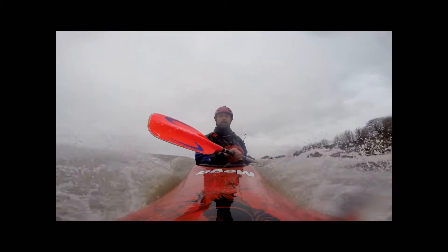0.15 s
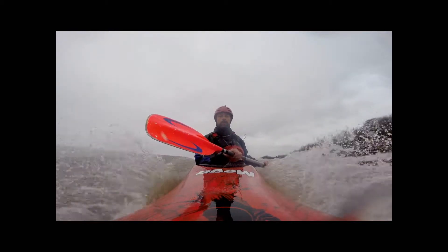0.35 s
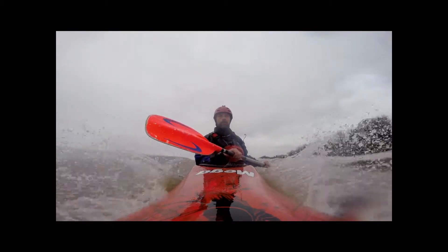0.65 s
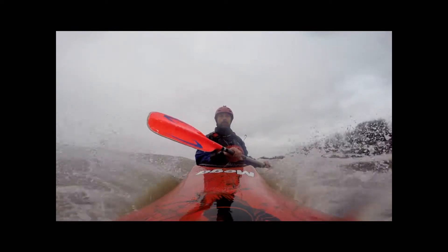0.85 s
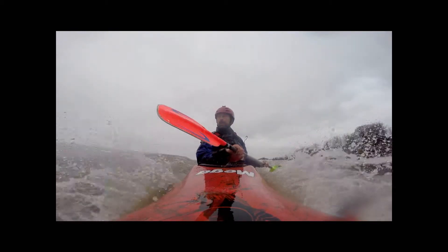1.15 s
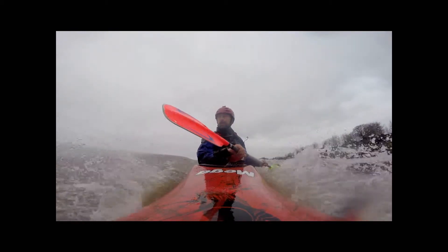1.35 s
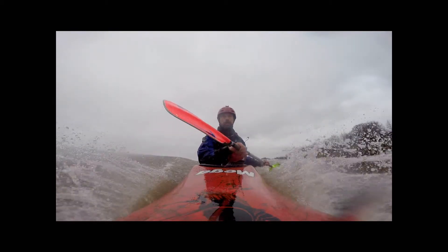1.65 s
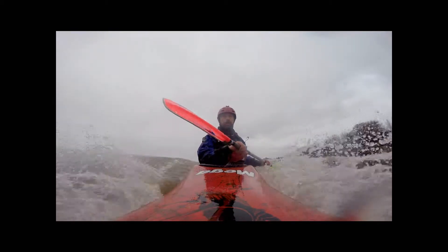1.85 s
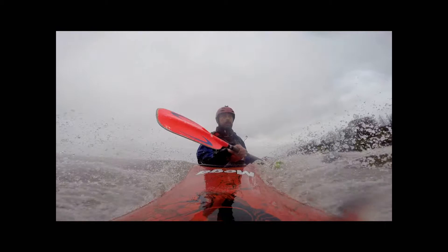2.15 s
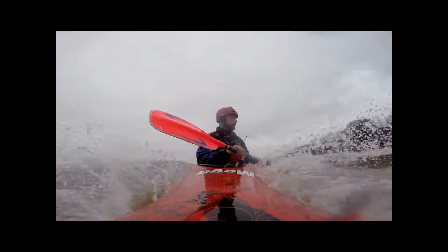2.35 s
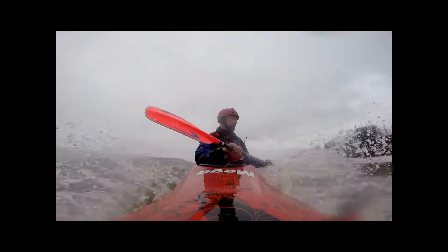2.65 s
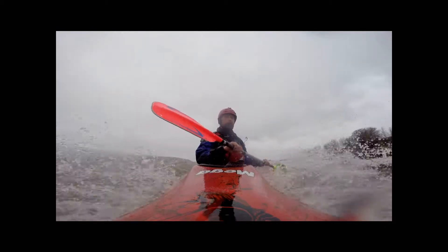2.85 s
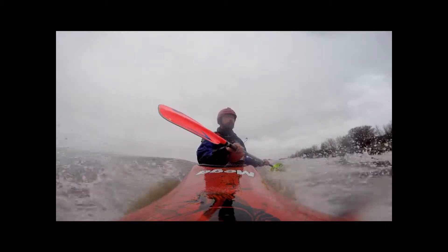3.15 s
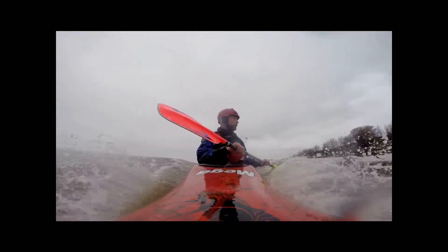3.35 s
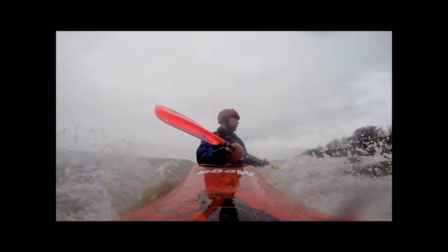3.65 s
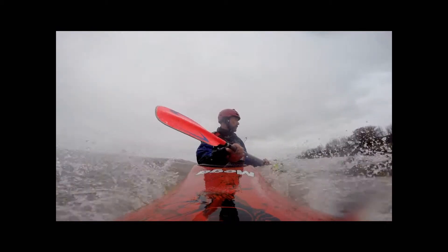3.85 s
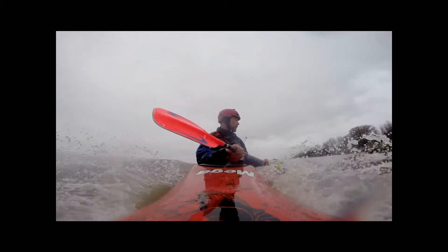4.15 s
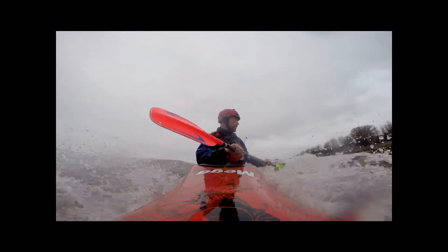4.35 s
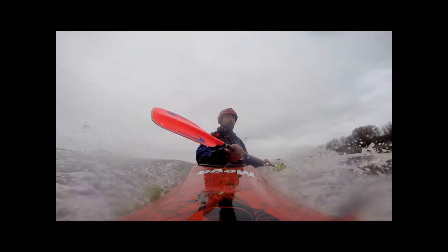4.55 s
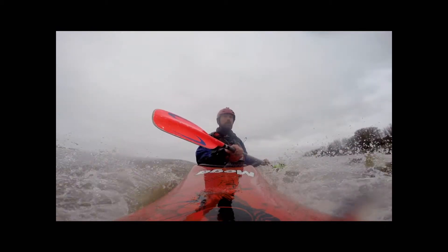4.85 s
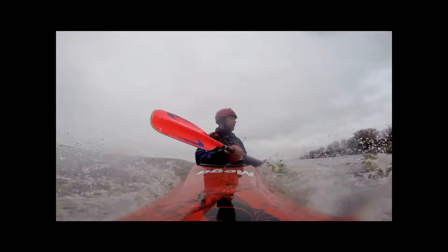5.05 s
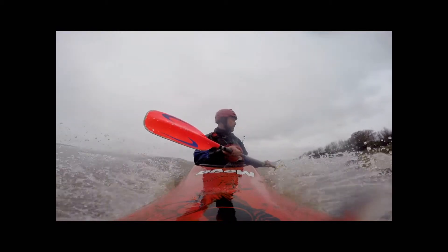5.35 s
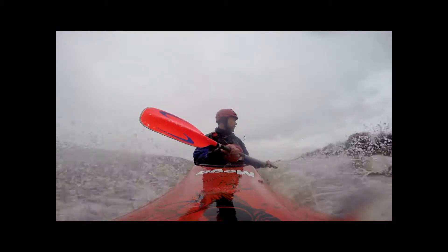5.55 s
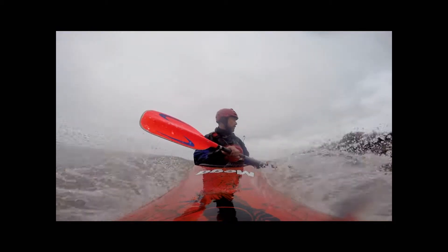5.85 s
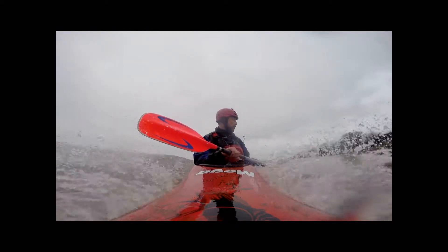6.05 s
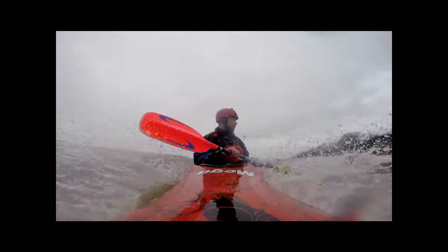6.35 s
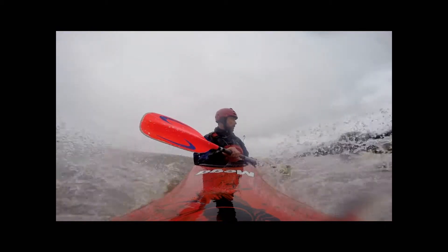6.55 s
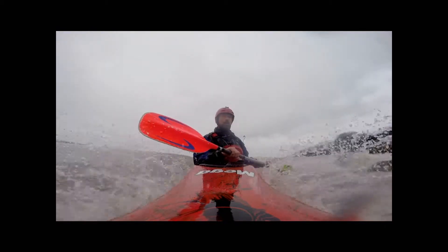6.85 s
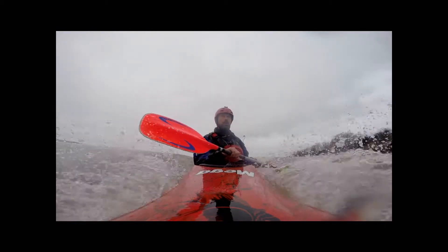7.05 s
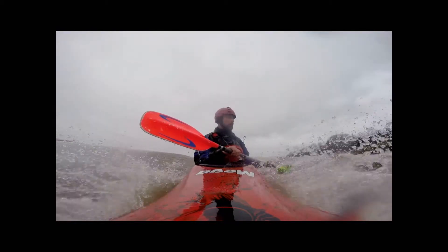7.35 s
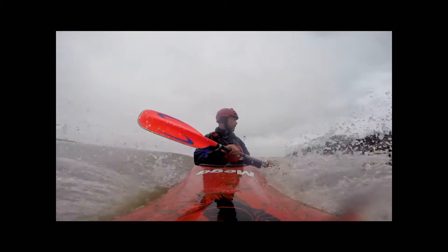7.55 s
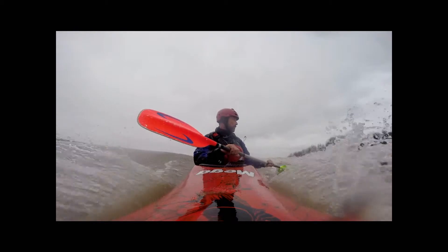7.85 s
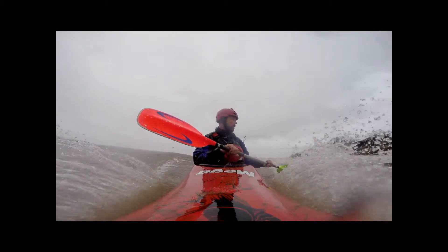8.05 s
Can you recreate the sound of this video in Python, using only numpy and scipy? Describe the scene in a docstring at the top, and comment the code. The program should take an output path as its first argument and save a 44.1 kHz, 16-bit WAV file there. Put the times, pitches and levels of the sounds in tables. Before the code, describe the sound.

For about eight seconds, whitewater churns around a plastic kayak, heard from a microphone in a sealed case on the deck. Waves thump the hull several times a second, swelling a deep, wavering hum and hollow rumble. Above this, close spray spatters, small bubbles burst and foam hisses, with an even hiss of water farther away. The case makes the water sound boxy and softens its top end.

Sheets of spray surge around 1.3, 2.7, 3.3, 4.3, 5.3 and 7.3 seconds. Short, sharp splashes slap the case irregularly throughout, standing out near 1.3, 2.6, 3.3, 3.6 and 5.7 seconds and crowding together from 7.3 seconds to the end. Occasional droplets give tiny high pings, several close together just before 7 seconds. The rush dips for an instant here and there, as at 2.2 and 5.2 seconds, but never stops.

```python
"""On the deck of a plastic kayak in whitewater, the microphone shut in a sealed case.
Right underneath, waves thump the hull, which hums and rumbles in its low modes. Close by, spray
spatters on deck and case, bubbles burst and foam hisses; water farther off adds an even, bright hiss.
Splashes slap and droplets ping on the case, whose resonances colour the spray and the splashes."""
import sys
import numpy as np
from scipy import signal
from scipy.fft import rfft, irfft
from scipy.io import wavfile
from scipy.ndimage import uniform_filter1d, minimum_filter1d

SR = 44100
rng = np.random.default_rng(int(sys.argv[2]) if len(sys.argv) > 2 else 0)


def int16_out(signal):
    """Quantize to a 16-bit WAV file."""
    q = np.round(np.clip(np.atleast_2d(signal).T, -1, 1) * 32767)
    wavfile.write(sys.argv[1], SR, q.astype(np.int16))


N = 361179
TIME = np.arange(N) / SR
# slow relative levels, ducking after the slaps at 0.46 and 3.56 s:
# t/s, hull ring/dB, spatter/dB, fine foam/dB
LEVELS = [(0, -47, -46, -38), (0.13, -44.5, -48.5, -43), (0.34, -38.5, -44, -33), (0.47, -54, -46, -53),
          (0.57, -46, -47.5, -51), (0.9, -42.5, -41.5, -38.5), (1.2, -38, -40.5, -40), (1.7, -51, -38, -38),
          (2.6, -42, -35, -40), (3.3, -43, -40, -41), (3.55, -43.5, -36, -42.5), (3.72, -45.5, -42, -43.5),
          (3.9, -43.5, -36, -39), (5, -42, -39.5, -37), (6, -40, -36, -37.5), (6.8, -42.5, -35.5, -36),
          (7.2, -39.5, -39, -32.5), (7.5, -40.5, -32.5, -37.5), (7.9, -38, -36, -31.5),
          (8.19, -41, -36, -34.5)]


def undb(db):
    """Gain of a level in dB."""
    return 10 ** (np.asarray(db) / 20)


def unit(x):
    """Scaled to rms 1."""
    return x / np.sqrt(np.mean(x ** 2))


def columns(table):
    """Each column after the time column, sample by sample."""
    times, *curves = np.transpose(table)
    return [np.interp(TIME, times, curve) for curve in curves]


def band(x, hz, width):
    """Two-pole resonance, gain 1 at the centre."""
    return signal.lfilter(*signal.iirpeak(hz, hz / width, fs=SR), x)


def noise_band(hz, width):
    """Noise passed twice through one resonance."""
    return band(band(rng.standard_normal(N), hz, width), hz, width)


def walk(rate):
    """Random levels held 1 / rate s and slewed twice; spread 1."""
    hold = int(SR / rate)
    steps = np.repeat(rng.standard_normal(N // hold + 1), hold)
    slewed = uniform_filter1d(uniform_filter1d(steps, hold), hold)[:N]
    return slewed / slewed.std()


def swells(base_db, rows):
    """A level in dB with bell-shaped swells (t/s, level/dB, rise/s, fall/s) added in power."""
    t = TIME[::64]
    power = sum(undb(2 * db) * np.exp(-((t - s) / np.where(t < s, rise, fall)) ** 2)
                for s, db, rise, fall in rows)
    return 10 * np.log10(undb(2 * base_db) + np.interp(TIME, t, power))


def colour(x, points, modes=(), size=8192):
    """Minimum-phase filter whose gain follows the spectrum points plus bell-shaped modes."""
    f = np.maximum(np.fft.rfftfreq(size, 1 / SR), 1)
    hz, db = np.transpose(points)
    bells_db = sum(height / (1 + (2 * (f - centre) / width) ** 2) for centre, width, height in modes)
    gain_db = np.interp(np.log(f), np.log(hz), db) + bells_db
    cepstrum = irfft(np.log(undb(gain_db)))
    cepstrum[1:size // 2] *= 2
    cepstrum[size // 2 + 1:] = 0
    return signal.fftconvolve(x, irfft(np.exp(rfft(cepstrum))))[:N]


def plip(hz, cycles, glide):
    """A damped tone that glides up; it decays by 1/e in the given number of cycles."""
    t = np.arange(int(5 * cycles / hz * SR)) / SR
    age = t * hz / cycles
    return np.sin(2 * np.pi * hz * t * (1 + glide * age / 2)) * np.exp(-age) * (1 - np.exp(-6 * age))


def through_case(x, size=8192):
    """Water as the microphone hears it through the resonant walls of the sealed case."""
    # broad spectrum inside the case: f/Hz, level/dB
    spectrum = [(220, -40), (380, -14.5), (464, -11.5), (640, -3.5), (831, -8), (1510, -5), (1680, -7.5),
                (2320, -5.5), (2790, -18), (3510, -12.5), (3850, -16.5), (9520, -35.5), (14900, -57.5)]
    # resonances and dips of the case: f/Hz, width/Hz, level/dB
    modes = [(700, 210, -3), (1568, 113, 3), (1650, 38, -11), (2510, 600, 4), (3200, 166, -9.5),
             (3320, 220, 3.5), (3835, 390, -4), (4880, 103, -7.5), (5350, 200, -3), (5990, 600, 3.5),
             (6460, 400, -7.5), (6800, 550, 0.5), (7470, 570, -5.5), (7950, 300, 2.5), (8590, 1100, -5.5),
             (9430, 700, 2), (10690, 850, -10), (13600, 620, 1.5)]
    return colour(x, spectrum, modes, size)


def hull_hum(hz=84, wander_hz=5.5, rest_db=-39.5, flutter_db=2.5):
    """The hull's lowest mode hums at a wandering pitch and swells with each wave."""
    # waves thumping the hull: t/s of the peak, level/dB, length/s
    thumps = [(0.018, -24, 0.036), (0.25, -29, 0.11), (0.37, -24, 0.05), (0.67, -39, 0.062),
              (0.77, -29.5, 0.097), (1.034, -28.5, 0.055), (1.307, -22.5, 0.045), (1.504, -25, 0.048),
              (1.663, -33, 0.11), (1.79, -27.5, 0.078), (2.024, -24.5, 0.1), (2.154, -29.5, 0.022),
              (2.308, -26, 0.053), (2.458, -26.9, 0.068), (2.612, -31, 0.045), (2.693, -25, 0.031),
              (2.875, -32.5, 0.04), (3.146, -27, 0.086), (3.288, -27.5, 0.14), (3.41, -26.5, 0.089),
              (3.503, -30, 0.06), (3.79, -34.5, 0.056), (3.917, -30, 0.041), (4.034, -23.5, 0.05),
              (4.223, -26.5, 0.09), (4.36, -27, 0.05), (4.528, -27, 0.096), (4.705, -26.5, 0.077),
              (4.984, -22.5, 0.089), (5.107, -26.5, 0.051), (5.26, -23.5, 0.054), (5.364, -22.5, 0.066),
              (5.46, -29, 0.067), (5.56, -32, 0.092), (5.72, -35.5, 0.065), (5.87, -25, 0.055),
              (6.01, -21, 0.039), (6.133, -27.6, 0.052), (6.39, -28, 0.2), (6.504, -23.5, 0.055),
              (6.768, -29, 0.037), (6.86, -33.5, 0.047), (6.945, -28, 0.044), (7.02, -26, 0.042),
              (7.177, -30, 0.066), (7.256, -32, 0.044), (7.352, -27.7, 0.028), (7.5, -33, 0.05),
              (7.62, -30, 0.055), (7.755, -28.3, 0.052), (7.957, -23.5, 0.036), (8.065, -29, 0.065)]
    rows = [(s, db, 0.4 * length, 0.47 * length) for s, db, length in thumps]
    level_db = swells(rest_db + 3.7 * walk(8), rows)
    phase = 2 * np.pi * np.cumsum(hz + wander_hz * walk(25)) / SR
    return unit(np.sin(phase)) * undb(level_db + flutter_db * walk(25))


def hull_ring(rise_s=0.023, fall_s=0.03, rumble_db=-35.5):
    """Buffeting water rings the higher hull modes and, less strongly, swells a broad rumble."""
    # higher hull modes: f/Hz, width/Hz, relative level/dB
    modes = [(110.4, 9.4, -2), (167.1, 21.2, 5), (193, 24, -15), (305.8, 41.5, 0.5), (372.7, 22, -10)]
    # short knocks on the hull: t/s of the peak, level/dB
    knocks = [(0.32, -38), (0.45, -39.5), (0.65, -39), (1.27, -37), (1.59, -38.5), (1.77, -33),
              (2.15, -36.5), (2.31, -37.5), (2.66, -37.5), (2.81, -38.5), (3.81, -39), (3.92, -40),
              (4.03, -40.5), (4.28, -36.5), (4.45, -35), (4.9, -36.5), (5.97, -41), (6.08, -40), (6.4, -39),
              (6.8, -38.5), (6.95, -37.5), (7.09, -38.5), (7.4, -34.5), (7.91, -33)]
    # drift of the balance toward the modes above (+) or below (-) 250 Hz: t/s, tilt/dB
    tilt = [(0, 1.5), (1.1, 2), (2.3, -2), (3.3, 0.5), (4, -1), (5, 2), (6, -0.5), (7, -1), (7.7, -1),
            (8.19, -2.5)]
    # spectrum of the hull's rumble: f/Hz, relative level/dB
    rumble_spectrum = [(11, -36.5), (18, -25), (61, -7.5), (86, -1), (106, -7.5), (136, -20.5), (181, -22),
                       (229, -24.5), (314, -22.5), (480, -50.5), (620, -56.5), (1060, -120)]
    ring_db = swells(columns(LEVELS)[0] + 1.08 * walk(16), [(s, db, rise_s, fall_s) for s, db in knocks])
    tilt_db, = columns(tilt)
    ring = sum(undb(db + np.sign(hz - 250) * tilt_db) * unit(noise_band(hz, 1.43 * width))
               for hz, width, db in modes)
    rumble = unit(colour(rng.standard_normal(N), rumble_spectrum, modes=[(90.0, 32, -3)]))
    swell_db = .3 * (ring_db - ring_db.mean())
    return unit(ring) * undb(ring_db) + rumble * undb(rumble_db + swell_db)


def drops(rate, spread_db, fade_ms, rise_ms):
    """Power envelope of scattered drops: many small, few large, each swelling and fading fast."""
    when, size = rng.random((int(rate * N / SR), 2)).T
    hits = np.zeros(N)
    np.add.at(hits, (when * N).astype(int), undb(-2 * spread_db * np.log(1 - .97 * size)))
    for ms in (fade_ms, rise_ms):
        hits = signal.lfilter([1], [1, -np.exp(-2000 / (ms * SR))], hits)
    return hits / hits.mean()


def spatter(shared=0.74, steady=0.34):
    """Drops strike in many bands at once or in one, over a steady wash. Rows: coarse part, fine foam."""
    wide = drops(rate=55, spread_db=4.0, fade_ms=5.0, rise_ms=3.5)
    out = 0
    for hz in 450 * 2 ** np.arange(0, 5.1, .5):
        own = drops(rate=60, spread_db=3.6, fade_ms=3.9, rise_ms=3.2)
        # the treble is mostly fine foam: drops stand out less there and seldom fall in step
        coarse = 1 / (1 + (hz / 4000) ** 2)
        together = shared / (1 + (hz / 2500) ** 2)
        power = steady ** 2 + (0.19 + 0.37 * coarse) * (together * wide + (1 - together) * own)
        out = out + np.sqrt([[coarse], [1 - coarse]]) * unit(np.sqrt(power)) * noise_band(hz, hz / 1.45)
    return out


def bubbles(rate=220, low_hz=1300, octaves=2.2, spread_db=3.5):
    """Small bubbles burst in the churn at scattered times and pitches; rms 1."""
    out = np.zeros(N + SR)
    for when, pitch, size, ring in rng.random((int(rate * N / SR), 4)):
        tone = plip(low_hz * 2 ** (octaves * pitch), cycles=2.5 + 4.0 * ring, glide=.01)
        i = int(when * N)
        out[i:i + len(tone)] += tone * undb(-spread_db * np.log(1 - .97 * size))
    return unit(out[:N])


def whitewater(gush_foam_db=-9.5):
    """Spray on the deck, churn along the hull and distant water, all heard through the case."""
    # sheets of spray thrown over the deck: t/s of the peak, relative level/dB, length/s
    gushes = [(0.018, -35, 0.054), (0.203, -38.5, 0.042), (0.34, -38.5, 0.07), (1.004, -33, 0.05),
              (1.2, -32.5, 0.074), (1.34, -31, 0.11), (1.885, -34.5, 0.26), (2.693, -31, 0.23),
              (3.16, -31.5, 0.29), (3.343, -28.5, 0.082), (3.924, -39, 0.23), (4.2, -32, 0.075),
              (4.287, -31.5, 0.078), (4.468, -33.5, 0.22), (4.823, -35, 0.14), (4.967, -32, 0.06),
              (5.286, -33, 0.17), (5.603, -33.5, 0.19), (6.082, -33, 0.14), (6.67, -33, 0.056),
              (7.072, -33.5, 0.082), (7.34, -29.5, 0.12), (7.7, -32.5, 0.084), (7.913, -31, 0.062)]
    rows = np.array([(s, db, 0.44 * length, 0.5 * length) for s, db, length in gushes])
    _, spatter_db, foam_db = columns(LEVELS)
    flicker_db = 1.5 * walk(14)  # the spray also comes and goes at random
    spatter_db = swells(spatter_db + flicker_db, rows)
    foam_db = swells(foam_db + .6 * flicker_db, rows + [0, gush_foam_db, 0, 0])
    coarse, foam = spatter()
    spray = (coarse + bubbles() * undb(-11)) * undb(spatter_db) + foam * undb(foam_db)
    far_hiss = signal.lfilter([1, -1], [1, .3], rng.standard_normal(N)) * undb(-34.5)
    churn = band(rng.standard_normal(N), hz=575, width=500) * undb(-35.0 + 2.0 * walk(10))
    # far hiss and churn follow the foam's slow level
    surge = undb(0.24 * (uniform_filter1d(foam_db, size=SR // 4) - foam_db.mean()))
    return through_case(spray + (far_hiss + churn) * surge) * undb(7.0)


def splashes(fade_ms=2.2, lead_s=.0015, samples=4096):
    """Close splashes: each a short burst, strongest around its own centre, coloured by the case."""
    # loud splashes: t/s, peak level/dB, centre f/Hz, relative level of the broad part/dB
    slaps = [(0.389, -31, 1570, 0), (0.458, -21.5, 1580, -1), (0.636, -29, 2110, -8),
             (0.972, -26.5, 2330, 15), (1.216, -22, 2220, -6), (1.31, -19.5, 2200, -6),
             (1.414, -22, 1530, -11), (1.496, -26, 1530, 13), (1.591, -27.5, 1090, -6),
             (1.674, -27.5, 2180, -13), (1.822, -30.5, 2380, -1), (2.147, -25.5, 1330, -21.5),
             (2.228, -33, 2120, -16), (2.262, -26.5, 2210, -6), (2.404, -25.5, 2250, 11),
             (2.579, -19, 1190, -15), (2.891, -28, 1500, -22), (2.959, -29.5, 1330, -17),
             (3.072, -23.5, 1780, -12), (3.159, -23, 1540, -22), (3.209, -26.5, 2460, -11),
             (3.323, -18, 750, -15), (3.495, -29.5, 2180, -13), (3.563, -18, 2050, -24),
             (3.795, -24.5, 2040, -9), (3.958, -31.5, 2340, -13), (4.018, -26, 2400, -21),
             (4.192, -25, 1480, -13), (4.272, -23, 1970, 7), (4.438, -26, 2380, 1), (4.52, -24.5, 1240, -3),
             (4.578, -21.5, 1750, -1), (4.692, -22, 1970, -7), (4.81, -24.5, 2310, -15),
             (4.955, -21.5, 2160, -3), (5.054, -24, 1720, -9), (5.135, -26, 2430, -25),
             (5.264, -22, 2380, -9), (5.313, -22, 1510, -1), (5.372, -19.5, 2310, -5),
             (5.583, -23.5, 2110, -13), (5.662, -16.5, 2360, -40), (5.773, -28.5, 2350, -17),
             (5.804, -25, 2420, -23), (5.846, -21.5, 1980, -4), (6.069, -22, 1480, -12),
             (6.132, -22.5, 1510, -10), (6.172, -23, 2420, -16), (6.625, -22.5, 2100, -10),
             (6.687, -22.5, 2080, -9), (6.966, -26.5, 2320, -20), (7.066, -28.5, 2220, -18),
             (7.258, -25.5, 2390, -20), (7.32, -24, 2256, -19), (7.386, -24, 2400, -12),
             (7.42, -25, 1760, -14), (7.438, -26.5, 2450, -11), (7.462, -30, 2140, -7),
             (7.525, -36, 1720, -4), (7.563, -19, 1490, -13), (7.639, -21.5, 1420, -6),
             (7.691, -22.5, 1460, -1), (7.876, -28, 1440, -14), (7.899, -19.5, 2280, -12),
             (7.988, -20.5, 2350, -5), (8.023, -27, 2150, -19), (8.084, -19.5, 1810, 0)]
    out = np.zeros(N + samples)
    t = np.arange(samples) / SR
    for s, db, hz, broad_db in slaps:
        burst = rng.standard_normal(samples) * t * np.exp(-1000 * t / fade_ms)  # swells, then fades
        broad = signal.lfilter([.3], [1, -.75], burst)
        slap = through_case(band(burst, hz, width=350) + undb(broad_db) * broad, size=1024)[:samples]
        i = int((s - lead_s) * SR)
        out[i:i + samples] += slap * undb(db) / np.abs(slap).max()
    return out[:N]


def pings():
    """Droplets hit the case right at the microphone, each ringing one of its modes."""
    # droplets on the case: t/s, level/dB, f/Hz
    droplets = [(0.4574, -35, 3340), (0.8116, -35.5, 3500), (0.9686, -34, 3580), (1.2565, -27.5, 3500),
                (1.4975, -30, 3470), (2.0414, -36, 3420), (2.581, -28, 3450), (3.304, -31, 4430),
                (4.5216, -35, 4410), (4.6897, -37, 3600), (4.9564, -30, 3490), (5.3126, -28, 3490),
                (6.1734, -29, 3380), (6.6877, -27.5, 3630), (6.8488, -31, 3470), (6.906, -33, 3420),
                (6.967, -26, 3480), (7.4385, -29, 3460), (7.5617, -29, 3380), (7.8994, -30, 3400),
                (8.1374, -31, 3590)]
    out = np.zeros(N + SR)
    for s, db, hz in droplets:
        tone = plip(hz, cycles=11.0, glide=.002)
        i = int(s * SR)
        out[i:i + len(tone)] += tone * undb(db)
    return out[:N]


def level_dips(half_width_s=0.02):
    """The level of spray and hull ducks briefly: the change in dB."""
    # brief dips (-) and two slight lifts (+): t/s of the centre, level change/dB
    dips = [(1.12, -1), (1.46, 1.5), (1.71, -1), (2.21, -5), (2.5, 1), (3.27, -3.5), (3.6, -4), (4.12, -2),
            (4.65, -3), (4.77, -2.5), (5.17, -4.5), (5.45, -3), (5.75, -3.5), (6.02, -3), (6.6, -4),
            (7.19, -4), (7.8, -2.5), (8.05, -3.5)]
    t = TIME[::64]
    return np.interp(TIME, t, sum(db * np.exp(-((t - s) / half_width_s) ** 2) for s, db in dips))


def scene():
    """Hull, water, splashes and pings at one microphone; the hull ducks about half as far as the spray."""
    water = whitewater()
    hull = hull_hum() + hull_ring()
    dip_db = level_dips()
    return (hull * undb(0.49 * dip_db) + water * undb(dip_db) + splashes() + pings())[None]


def record(dry):
    """A limiter eases the gain down around the loudest peaks; then the top is cut."""
    ceiling, window, top_hz = .152, 441, 15050  # window: 10 ms
    allowed_gain = np.minimum(1, ceiling / (np.abs(dry) + 1e-9))
    gain = uniform_filter1d(minimum_filter1d(allowed_gain, size=window), size=window)
    lowpass = signal.ellip(10, .2, 50, top_hz, fs=SR, output="sos")
    return signal.sosfilt(lowpass, dry * gain)


dry = scene()
out = record(dry)
int16_out(out)
```